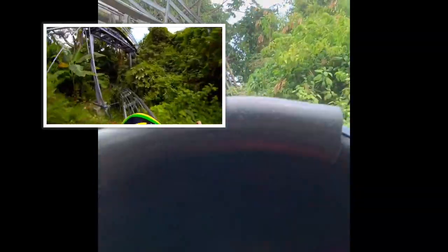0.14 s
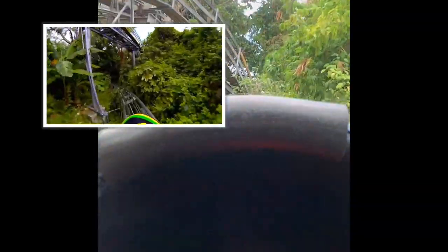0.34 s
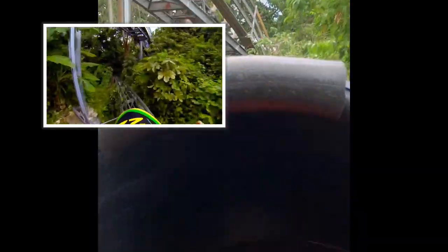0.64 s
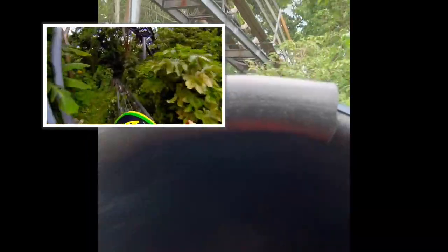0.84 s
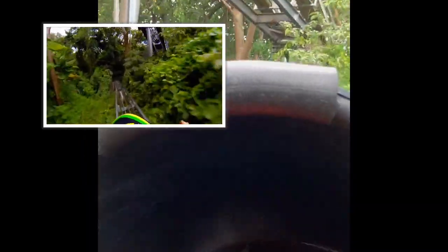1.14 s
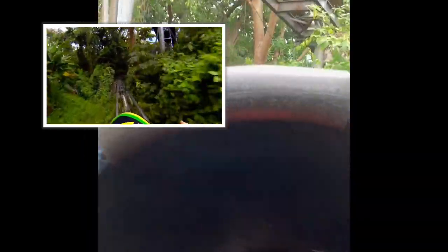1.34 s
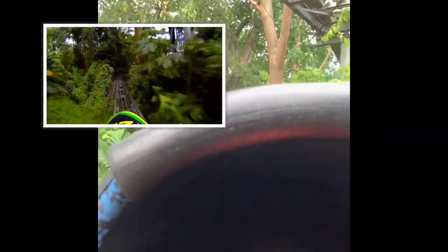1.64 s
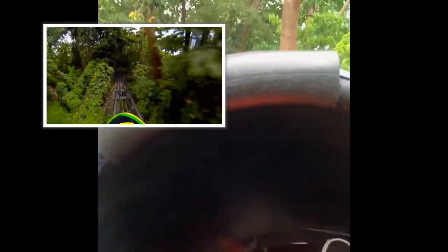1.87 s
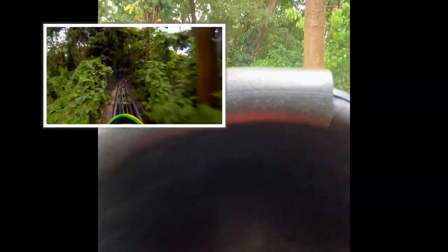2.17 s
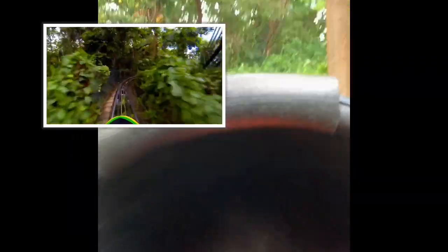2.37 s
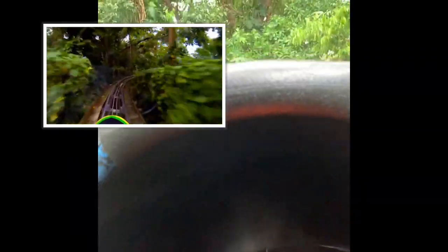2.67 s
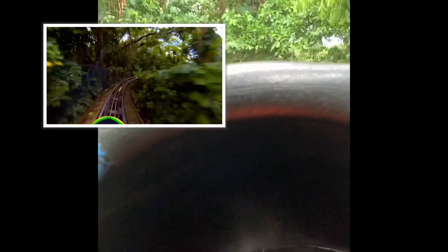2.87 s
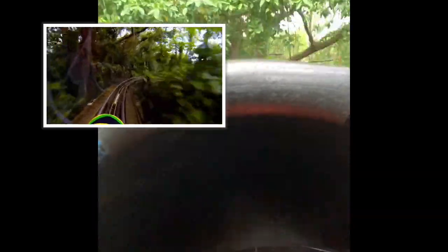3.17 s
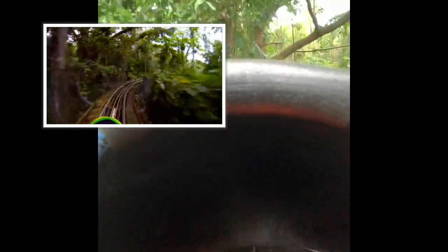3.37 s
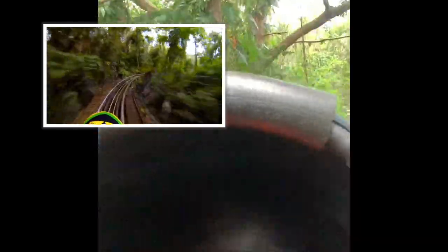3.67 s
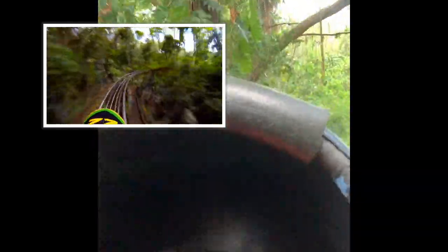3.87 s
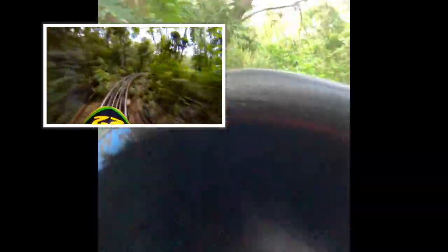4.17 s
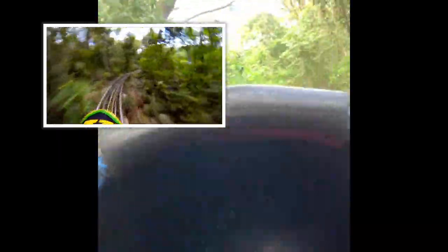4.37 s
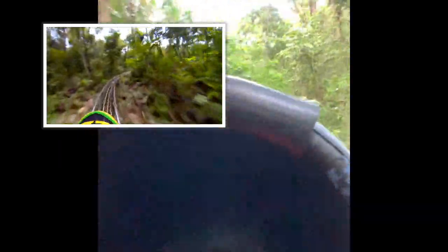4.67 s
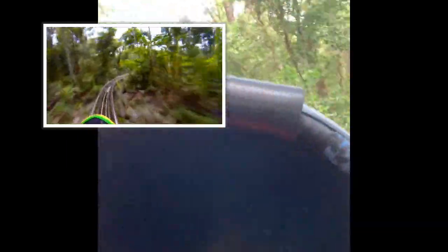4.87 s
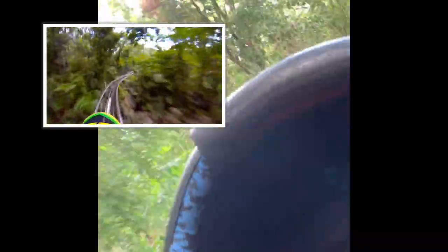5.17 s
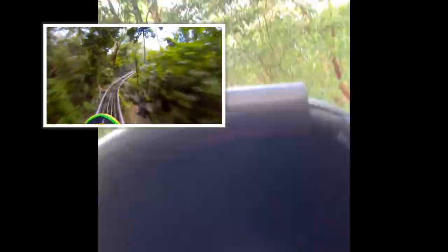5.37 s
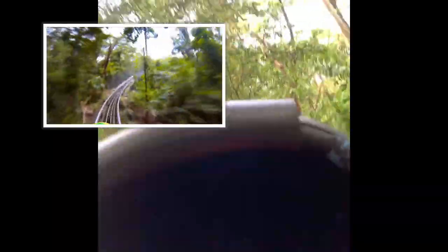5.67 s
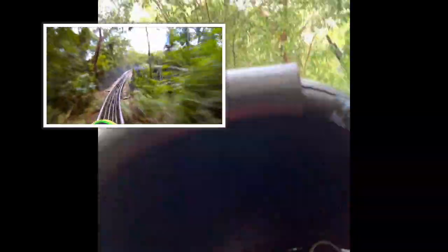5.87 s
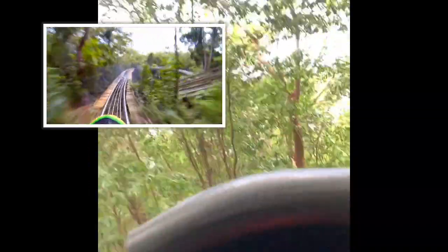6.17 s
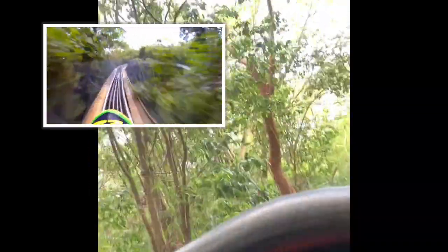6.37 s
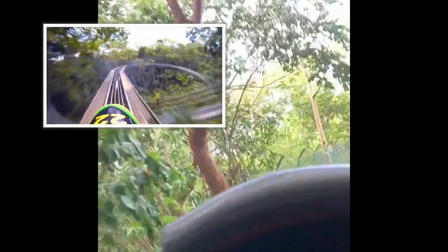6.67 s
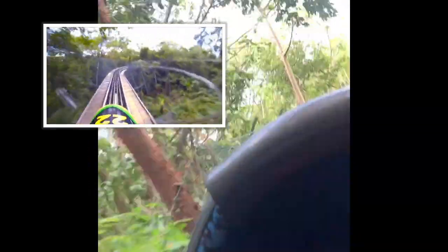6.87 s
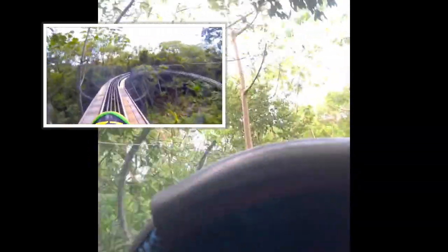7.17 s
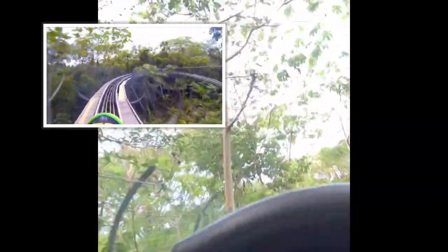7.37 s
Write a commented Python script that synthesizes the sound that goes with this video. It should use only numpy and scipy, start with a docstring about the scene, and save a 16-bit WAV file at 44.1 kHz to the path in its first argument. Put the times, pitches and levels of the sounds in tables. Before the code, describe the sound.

Heard from the seat, wheels rumble and drone ever faster on steel rails, with buffeting air, clatter, and a burst of bangs past midway.

```python
"""On a mountain coaster, heard from the seat: a car gathers speed down a track of steel tubes.
Slightly uneven wheels throb with each turn and shake the shell, the wheels and the tubes into a drone and roar.
Random taps make the wheel carriers clatter, rubbing parts sing gliding tones, and air buffets and hisses.
A bright fizz, faint at first, grows stronger and swells along with the hiss.
Bumps boom, ticks snap, loose fittings crack and ring, and slamming carriers clank: short hits at set times."""
import sys
import numpy as np
from scipy import signal
from scipy.fft import rfft, irfft, next_fast_len
from scipy.io import wavfile

SR = 44100
rng = np.random.default_rng(int(sys.argv[2]) if len(sys.argv) > 2 else 0)


def put_to_file(sound):
    """Save the sound as 16-bit audio at rate SR, in the file named by the first command-line argument."""
    columns = np.atleast_2d(sound).T  # one column per channel
    safe = np.clip(columns, -1, 1)
    whole_steps = np.round(safe * 32767)
    wavfile.write(sys.argv[1], SR, whole_steps.astype(np.int16))


N = 331632


def amp(db):
    """Turn decibels into a gain."""
    return 10 ** (np.asarray(db) / 20)


def unit(x):
    """Scale to rms 1."""
    return x / np.sqrt(np.mean(x ** 2) + 1e-20)


def along(points, hz):
    """Read a (frequency, value) table on a log frequency axis."""
    f, v = np.transpose(points)
    return np.interp(np.log(hz + 1), np.log(f + 1), v)


def wobble(rate):
    """A smooth random curve with rate new random values a second."""
    count = int(N * rate / SR) + 4
    fine = signal.resample_poly(rng.standard_normal(count), 8, 1)
    return np.interp(np.arange(N) * rate / SR, np.linspace(0, count, len(fine)), fine)


def stretches(rows, attack_s, release_s):
    """Rise, hold and fall for each (start, length, dB, ..) row: one summed curve for each dB column."""
    t = np.arange(N) / SR
    shapes = []
    for start, length, *_ in rows:
        rise = (t - start) / attack_s
        fall = 1 - (t - start - length) / release_s
        shapes.append(np.clip(np.minimum(rise, fall), 0, 1))
    return np.array(rows)[:, 2:].T @ np.array(shapes)


def humps(rows):
    """A smooth swell or dip for each (middle, length, dB) row, summed."""
    t = np.arange(N) / SR
    return sum(db * np.cos(np.pi * np.clip((t - s) / length, -.5, .5)) ** 2 for s, length, db in rows)


def filtered(x, response):
    """Apply a complex response of frequency."""
    size = next_fast_len(N + SR // 2)
    return irfft(rfft(x, size) * response(np.fft.rfftfreq(size, 1 / SR)), size)[..., :N]


def resonant(modes, hz):
    """Response of several resonances, added with alternating sign."""
    total = 0
    for k, (centre, width, db) in enumerate(modes):
        damping = 1j * hz * width
        total = total + (-1) ** k * amp(db) * damping / (centre * centre - hz * hz + damping)
    return total


# how alike left and right are: f/Hz, likeness (1 = the same)
LIKENESS = [(30, .985), (125, .975), (250, .89), (350, .8), (490, .87), (720, .25), (870, .62), (1200, .8),
            (1600, .82), (2300, .56), (2900, .42), (3500, .78), (4400, .9), (4900, .995), (6200, .9),
            (7100, .99), (8000, .9), (9000, .998), (15000, .99)]


def spread(pair, response):
    """Colour two unrelated signals and blend them into left and right, at rms 1."""
    def blend(hz):
        turn = np.arccos(np.clip(along(LIKENESS, hz), -1, 1)) / 2
        return response(hz) * np.array([np.cos(turn), np.sin(turn)])
    mid, side = filtered(pair, blend)
    return unit(np.array([mid + side, mid - side]))


def rush(spectrum):
    """Air noise: random stereo noise in the given colour."""
    return spread(rng.standard_normal((2, N)), lambda hz: amp(along(spectrum, hz)))


# how fast the wheels spin: t/s, speed/turns per second
WHEEL_SPEED = [(0.0, 12.14), (0.5, 12.28), (1.0, 12.71), (1.5, 13.27), (2.0, 14.12), (2.5, 15.64),
               (3.0, 17.19), (3.5, 18.89), (4.0, 20.37), (4.5, 21.19), (5.0, 21.58), (5.5, 22.82),
               (6.0, 25.25), (6.5, 26.97), (7.0, 28.08), (7.52, 29.01)]


def wheel_speed():
    """Wheel turns per second at every sample."""
    s, turns = np.transpose(WHEEL_SPEED)
    return np.interp(np.arange(N) / SR, s, turns)


def doublings():
    """How many times the speed has doubled since the start."""
    speed = wheel_speed()
    return np.log2(speed / speed[0])


def load(lead):
    """Swing of the wheel load: once a turn with a weaker double beat, less at high speed."""
    speed = wheel_speed()
    angle = 2 * np.pi * np.cumsum(speed) / SR + lead
    return (np.cos(angle) + .25 * np.cos(2 * angle - 1.2)) * (speed[0] / speed) ** .6


def contact(throb_db, flutter_db, lead):
    """Force of the wheels on the rail: surface noise that swells with the load."""
    swell = amp(throb_db * load(lead) + flutter_db * wobble(45))
    return lambda: swell * rng.standard_normal((2, N))


def shaken(force, modes, spectrum, direct_db, blur_db, swell_db):
    """A shaken part: randomly swelling resonances, plus broad noise whose share changes with speed."""
    colour = lambda hz: amp(along(spectrum, hz))
    drive = spread(force(), colour)
    rings = 0
    for mode in modes:
        ringing = filtered(drive, lambda hz: resonant([mode], hz))
        rings = rings + amp(swell_db * wobble(5)) * ringing
    broad = amp(direct_db + blur_db * doublings())  # blur_db is per doubling of speed
    return (rings + broad * spread(force(), colour)) / np.hypot(broad, rings.std())


def blows(rows, shape):
    """Place a freshly made hit of peak 1 at each (time, dB, ..) row."""
    out = np.zeros(N + SR)
    for s, db, *rest in rows:
        hit = shape(*rest)
        out[round(s * SR):][:len(hit)] += amp(db) * hit / abs(hit).max()
    return out[:N]


def ring(modes, t):
    """Fading tones, at slightly new pitches and strengths for every blow."""
    total = 0
    for hz, width, db in modes:
        pitch = hz * rng.normal(1, .02)
        strength = amp(db + rng.normal(0, 1.5))
        total = total + strength * np.exp(-np.pi * width * t) * np.sin(2 * np.pi * pitch * t)
    return total


# resonances of the shell, wheels and steel tubes: f/Hz, width/Hz, relative level/dB
SHELL_MODES = [(105.5, 28, 0.5), (139.2, 40, 2.5), (178.6, 31, 0), (230.7, 34, -4.5)]
WHEEL_MODES = [(302, 42, -4), (392.6, 97, -1.5), (470.4, 40, 1.5), (562, 9.3, -2.5)]
TUBE_MODES = [(857, 43, 5), (1096, 34, 3), (1212, 34, -1), (1464, 210, -7), (1585, 100, -21.5),
              (2126, 8.5, 4.5), (2273, 32, -0.5)]
# colours of the noise that shakes each of them: f/Hz, relative level/dB per Hz
RUMBLE_COLOUR = [(30, -26.5), (80, -2.5), (130, 1.5), (240, -1), (330, -11.5), (700, -30.5), (2000, -93)]
DRONE_COLOUR = [(120, -60), (280, -0.5), (480, -0.5), (580, -6), (700, -6.5), (1200, -25.5), (3000, -70)]
ROAR_COLOUR = [(300, -26), (650, -8.5), (900, 4), (1150, 3.5), (1600, -2), (2000, -4), (2400, -10),
               (2750, -10.5), (4500, -57), (8000, -61.5)]
# rough stretches of track: start t/s, length/s, added wheel drone level/dB, added rail roar level/dB
ROUGH_TRACK = [(.5, 0.58, 0, 1.5), (1.42, 0.88, 1, 2.5), (2.28, 0.26, 1.5, 2), (2.55, 0.71, 1.8, 0.5),
               (3.6, 0.63, 0.2, 2.1), (4.11, 0.43, 0.5, 2), (4.39, 0.33, -0.5, 4.5), (4.688, 0.18, 8, 8),
               (4.79, 0.085, -1.5, 2.5), (4.9, 0.24, 4.5, 6.5), (5.13, 0.37, 2.5, 7),
               (5.58, 0.063, -1, 6.5), (6.25, 0.16, -0.5, 2), (6.95, 0.1, 1, 1), (7.43, .2, 6.5, 5)]
ROUGH_ATTACK_S, ROUGH_RELEASE_S = 0.016, 0.055
# the track presses the car down in a bend or lets it go light: middle t/s, length/s, added rumble level/dB
BEND_LOAD = [(.88, .35, -2), (2.57, 0.16, -4), (4.5, 4.7, 2.5), (4.95, 0.2, -5), (5.69, .12, -2),
             (6.325, 0.13, -2), (6.65, .6, -1), (7.28, 0.23, -2)]
# RISE is added level for each doubling of speed; SHARE is how much of the rough wheel dB the shell gets
RUMBLE_DB, RUMBLE_SHARE = -20.5, 0.32
DRONE_DB, DRONE_RISE_DB = -27.5, 3
ROAR_DB, ROAR_RISE_DB = -35.5, 2.5
RAIL_LEAD = .45  # radians of a turn added to the rail's throb


def rolling():
    """The rolling force makes the shell rumble, the wheels drone and the steel tubes roar."""
    rough_wheel_db, rough_rail_db = stretches(ROUGH_TRACK, ROUGH_ATTACK_S, ROUGH_RELEASE_S)
    rumble_db = RUMBLE_DB + humps(BEND_LOAD) + RUMBLE_SHARE * rough_wheel_db
    drone_db = DRONE_DB + DRONE_RISE_DB * doublings() + rough_wheel_db
    roar_db = ROAR_DB + ROAR_RISE_DB * doublings() + rough_rail_db + 0.5 * wobble(12.0)

    cushioned = contact(throb_db=2, flutter_db=.7, lead=.2)
    hard = contact(throb_db=2.3, flutter_db=1, lead=0)
    steel = contact(throb_db=2.7, flutter_db=1.3, lead=RAIL_LEAD)

    shell = shaken(cushioned, SHELL_MODES, RUMBLE_COLOUR, direct_db=-11.5, blur_db=10.5, swell_db=1.8)
    wheels = shaken(hard, WHEEL_MODES, DRONE_COLOUR, direct_db=-4.5, blur_db=-2.5, swell_db=1)
    rail = shaken(steel, TUBE_MODES, ROAR_COLOUR, direct_db=-9.0, blur_db=8.0, swell_db=2)
    return amp(rumble_db) * shell + amp(drone_db) * wheels + amp(roar_db) * rail


# resonances of the chattering wheel carriers: f/Hz, width/Hz, relative level/dB
CARRIER_MODES = [(910, 200, 0.5), (1123, 147, 3.5), (1380, 200, 3), (1637, 150, -2.5), (1894, 220, -4),
                 (2132, 170, -3), (2373, 320, -2.5)]
# short bursts of rattling: start t/s, length/s, added clatter level/dB
RATTLE_BURSTS = [(2.13, 0.012, 4.5), (2.222, 0.032, 10.5), (2.275, 0.027, 6.5), (2.372, 0.029, 10),
                 (2.425, 0.032, 11), (2.59, 0.015, 8.5), (2.96, 0.022, 3), (3.29, 0.033, 11),
                 (4.14, 0.042, 1.5), (4.7, .065, 4.5), (4.8, 0.13, 4.5), (4.925, .1, 5.5), (5.003, 0.02, 6),
                 (5.15, .025, 3.5), (5.645, 0.033, 3), (6.362, .03, 5), (6.59, 0.022, 4), (7.46, .03, 1.5)]
RATTLE_ATTACK_S, RATTLE_RELEASE_S = .004, .015
CLATTER_DB, CLATTER_RISE_DB = -44.5, 5.5  # rise for each doubling of speed
CLATTER_GROWS = 1.014  # dB of clatter for each dB of added rail roar
CLATTER_THROB_DB, CLATTER_PATCHY_DB = 1.8, 2  # swing with the wheel load; random swing of each mode
TAPS_PER_S = 190  # at the starting speed, on smooth track
TAP_CROWDING = .55  # share of the shaking, in dB, that makes taps more frequent


def clatter():
    """Loose wheel carriers chatter: random taps ring their modes, in crowds with speed and on rough track."""
    _, rough_rail_db = stretches(ROUGH_TRACK, ROUGH_ATTACK_S, ROUGH_RELEASE_S)
    burst_db, = stretches(RATTLE_BURSTS, RATTLE_ATTACK_S, RATTLE_RELEASE_S)
    shake_db = CLATTER_RISE_DB * doublings() + CLATTER_GROWS * rough_rail_db + burst_db
    crowd = amp(TAP_CROWDING * shake_db)
    when = np.flatnonzero(rng.random(N) < crowd * TAPS_PER_S / SR)
    # crowded taps are smaller, so that crowding alone adds no power
    size = amp(rng.uniform(-5.6, 5.6, N))[when] / np.sqrt(crowd[when])

    def taps():
        # the same moments each time, with new strengths and signs
        return np.bincount(when, size * rng.uniform(-1, 1, N)[when], N)

    rings = 0
    for centre, width, db in CARRIER_MODES:
        pair = np.array([taps(), taps()])
        mode = spread(pair, lambda hz: resonant([(centre, width, 0)], hz) ** 2)
        rings = rings + amp(db + CLATTER_PATCHY_DB * wobble(25)) * mode
    return amp(CLATTER_DB + shake_db + CLATTER_THROB_DB * load(RAIL_LEAD)) * unit(rings)


# colour of the air's thuds: f/Hz, relative level/dB per Hz
BUFFET_COLOUR = [(8, -4), (20, -2), (42, 3), (70, 2.5), (110, -11), (250, -18.5), (800, -96.5)]
# gusts and lulls at the microphones: middle t/s, length/s, added level/dB
AIR_GUSTS = [(0.078, 0.21, 3.5), (1.35, .6, 7.5), (2.453, 0.27, 10.5), (3.27, 0.28, 4), (3.628, 0.35, 6),
             (4.33, 0.64, 3.5), (5.2, 0.74, 5.5), (5.75, 0.79, 6.5), (6.24, 0.33, 5.5), (6.33, 0.11, -5),
             (6.696, 0.69, 0)]
BUFFET_DB, BUFFET_RISE_DB = -30.5, 8  # rise for each doubling of speed


def buffeting():
    """Air thuds against the microphones, harder with speed and in smooth gusts."""
    level_db = BUFFET_DB + BUFFET_RISE_DB * doublings() + humps(AIR_GUSTS) + 1.3 * wobble(12)
    return amp(level_db) * rush(BUFFET_COLOUR)


# colours of the hiss and of the bright fizz: f/Hz, relative level/dB per Hz
HISS_COLOUR = [(1000, 15.5), (2600, 11), (4000, 12.5), (5400, 7.5), (6300, 4.5), (7300, -2), (8500, -6.5),
               (11000, -60), (16000, -41)]
FIZZ_COLOUR = [(1500, 2), (4000, -5), (7000, 7.5), (10000, 2.5), (12500, 3.5), (14000, 1.5), (16000, -8.5)]
# rushes of air past the car, short ones riding on long ones: start t/s, length/s, added level/dB
AIR_RUSHES = [(.49, 0.11, 6), (1.38, 1.14, 3), (2.88, .55, 1.4), (3.47, .42, 4.5), (4.1, 1.376, 6),
              (4.78, 0.45, 3), (5.56, 0.048, 6), (6.03, 0.39, 3.5), (6.79, 0.31, 3), (7.41, .2, 6.5)]
RUSH_ATTACK_S, RUSH_RELEASE_S = .06, .08
# puffs and lulls that flutter on the rushes: middle t/s, length/s, added level/dB
AIR_PUFFS = [(.15, 0.1, 5.5), (.765, 0.063, 3), (.94, 0.14, 1), (1.66, 0.12, 2.5), (1.74, .09, -4.5),
             (2.19, 0.079, 0), (2.45, 0.13, 2.5), (2.588, 0.039, 7.5), (3.305, .07, 3.5), (3.72, .2, 2),
             (4.165, .11, 4), (4.24, .09, 3.5), (4.38, .16, -3), (4.59, .16, 2.5), (4.71, 0.051, 8.5),
             (4.765, 0.055, -4), (4.825, .08, 8.5), (4.89, .07, 5), (5.02, 0.12, 6.5), (5.09, 0.06, 6),
             (5.16, .08, 6), (5.46, 0.074, 4.5), (5.79, .1, 3), (5.89, 0.082, -5.5), (6.22, 0.17, 3),
             (6.5, 0.077, -6), (6.61, .1, -0.5), (6.95, 0.066, 4), (7.09, 0.15, 3.5), (7.19, 0.096, -5.5),
             (7.29, 0.16, 1)]
HISS_DB, HISS_RISE_DB = -42.5, 1  # rise for each doubling of speed
FIZZ_DB, FIZZ_RISE_DB = -72.5, 15
FIZZ_GROWS, FIZZ_MOST_DB = 1.71, 21.5  # dB of fizz for each dB of a light swell in the hiss; the most it adds


def airstream():
    """Air hisses past in fluttering rushes; a bright fizz, faint at first, grows and swells with the hiss."""
    rush_db = stretches(AIR_RUSHES, RUSH_ATTACK_S, RUSH_RELEASE_S)[0] + humps(AIR_PUFFS)
    flutter_db = .7 * wobble(35) + .3 * wobble(11)
    fizz_swell_db = FIZZ_MOST_DB * np.tanh(FIZZ_GROWS * rush_db / FIZZ_MOST_DB)
    hiss_db = HISS_DB + HISS_RISE_DB * doublings() + rush_db + flutter_db
    fizz_db = FIZZ_DB + FIZZ_RISE_DB * doublings() + fizz_swell_db + 2 * flutter_db + 0.72 * wobble(210)
    return amp(hiss_db) * rush(HISS_COLOUR) + amp(fizz_db) * rush(FIZZ_COLOUR)


# wheels, rails and shell sing up briefly; levels are before the fades and the throb:
# start t/s, length/s, start f/Hz, middle f/Hz, end f/Hz, level/dB
SINGING_TONES = [(0.015, 1.9, 552, 559, 565, -35), (0.534, 0.069, 723, 755, 805, -32),
                 (.54, 0.087, 1870, 1950, 1970, -45), (0.546, 0.072, 1560, 1590, 1670, -43),
                 (0.738, 0.076, 1850, 1930, 1900, -44), (0.981, 0.15, 1820, 1800, 1650, -42),
                 (.9, 0.54, 844, 860, 852, -41.5), (1.593, 2, 534.5, 557, 581, -36),
                 (1.717, 0.52, 1120, 1090, 1177, -37.5), (1.8, 1.63, 132, 132.8, 135.6, -24.5),
                 (1.75, 0.73, 233.4, 236.7, 247.5, -31.5), (4.683, 0.045, 428, 446, 414, -19),
                 (5.144, 0.17, 1107, 1067, 1015, -26), (5.8, 0.32, 84.6, 112.8, 83.5, -16.5),
                 (6.38, 0.74, 1051, 1077, 1097, -39), (6.626, .2, 2060, 2140, 2120, -52)]
SING_FUZZ = 1.1  # random wavering, relative to the steady tone
SING_FADE = .4  # share of a tone's length spent swelling and fading
SING_THROB_DB = 3  # swing up and down with each turn of the wheels


def singing():
    """Rubbing contact feeds one resonance for a while: a fuzzy gliding tone that pulses with the wheels."""
    out = np.zeros(N + SR)
    for s, length, start_hz, middle_hz, end_hz, db in SINGING_TONES:
        count = round(length * SR)
        arch = np.polyfit([-1, 0, 1], [start_hz, middle_hz, end_hz], 2)
        pitch = np.polyval(arch, np.linspace(-1, 1, count))
        angle = 2 * np.pi * np.cumsum(pitch) / SR
        fuzz_rate = 2.6 * np.sqrt(start_hz)  # higher tones waver faster
        fuzz = lambda: SING_FUZZ * wobble(fuzz_rate)[:count]
        tone = np.sin(angle) * (1 + fuzz()) + np.cos(angle) * fuzz()
        fade = signal.windows.tukey(count, SING_FADE)
        out[round(s * SR):][:count] += amp(db) * fade * unit(tone)
    turn = 2 * np.pi * np.cumsum(wheel_speed()) / SR
    return out[:N] * amp(SING_THROB_DB * np.cos(turn))


# bumps in the track: t/s, peak level/dB, pitch as a multiple of the shell's own
TRACK_BUMPS = [(.073, -5, 1), (.322, -4, .9), (.535, -10, .8), (1.104, -3.5, 1), (1.287, -6, 1.1),
               (2.451, -16.5, .8), (3.156, -9, 1), (3.974, -4, 1.1), (4.278, -10, 1), (4.695, -11, 1),
               (4.75, -1, .9), (5.048, -1, 1.2), (5.094, -2.5, 1.2), (5.358, -9, .7), (5.481, 0, .8),
               (5.614, -4, 1.9), (5.728, -14, .9), (6.273, -7, .8), (6.364, -3, 1.3), (7.465, -4, .9)]
BUMP_ATTACK_S, BUMP_DAMPING_HZ = .006, 14  # attack at pitch 1; damping added to the shell's own width


def bumps():
    """The chassis drops over a bump and the shell gives a short, damped boom."""
    t = np.arange(SR // 5) / SR
    damped = np.exp(-np.pi * BUMP_DAMPING_HZ * t)

    def boom(pitch):
        onset = 1 - np.exp(-pitch * t / BUMP_ATTACK_S)
        return damped * ring(SHELL_MODES, pitch * t) * onset
    return blows(TRACK_BUMPS, boom)


# small sharp ticks: t/s, peak level/dB, brightness/dB per octave, time to fall 60 dB/s
SHARP_TICKS = [(.8212, -32, -9.5, 0.0076), (1.4272, -25, -8, 0.0078), (2.44, -34, 1.5, .007),
               (3.186, -39.5, 3.5, .007), (4.283, -24, -4.5, 0.0077), (4.751, -18.5, -6, 0.0063),
               (5.029, -6.5, -2, 0.0098), (5.157, -20.5, -11.5, .012), (5.3382, -7.5, 10, .0022),
               (5.5594, -11.5, -9, 0.0042), (5.674, -28, 6, .004), (5.837, -28, 13, .005),
               (5.844, -30.5, 11, 0.0033), (5.9853, -12.5, -1.5, .007), (6.054, -25.5, 3, 0.0037)]
# colour of a tick before its brightness is added: f/Hz, relative level/dB per Hz
SNAP_COLOUR = [(300, -44), (1200, -26), (3000, 10.5), (6500, 13.5), (9000, 0.5), (16000, -5)]


def ticks():
    """Hard little contacts snap without ringing: quickly fading bursts of noise."""
    t = np.arange(SR // 20) / SR
    hz = np.fft.rfftfreq(len(t), 1 / SR) + 1

    def snap(tilt_db, t60):
        colour = amp(along(SNAP_COLOUR, hz) + tilt_db * np.log2(hz))
        noise = irfft(rfft(rng.standard_normal(len(t))) * colour, len(t))
        return noise * amp(-60 * t / t60)
    return blows(SHARP_TICKS, snap)


# knocks of loose fittings: t/s, peak level/dB, approximate pitch f/Hz, width of the ring/Hz
FITTING_KNOCKS = [(.8213, -7.5, 1150, 400), (1.4275, -12, 1210, 450), (2.362, -26, 1400, 420),
                  (2.482, -16, 1000, 380), (3.088, -15, 1000, 420), (3.139, -21, 1600, 420),
                  (3.186, -15.5, 1350, 380), (4.888, -13, 1550, 200), (5.028, -11, 1650, 420),
                  (5.055, -11, 1270, 220), (5.079, -8.5, 2050, 400), (5.094, -6.5, 1870, 400),
                  (5.268, -9.5, 1100, 120), (5.338, -1, 1280, 560), (5.477, -9, 1650, 450),
                  (5.4795, -8.5, 730, 280), (5.664, -17.5, 2190, 200), (5.728, -33, 1500, 420),
                  (5.985, -14, 1800, 480), (6.271, -12, 2700, 700), (6.274, -18, 980, 300),
                  (6.366, -17, 1300, 350), (6.467, -16, 900, 300), (6.984, -18, 1960, 70),
                  (7.048, -18, 1700, 200), (7.054, -16, 2000, 220), (7.057, -18, 1080, 90)]
# modes of a fitting: multiple of its pitch, multiple of its width, relative level/dB
FITTING_MODES = [(1, 1, 0), (1.16, 1.6, -5), (1.5, 2.4, -14)]
# colour of the rough crack that starts a knock: f/Hz, relative level/dB per Hz
CRACK_COLOUR = [(200, -27), (700, 1), (1100, 7), (2200, -6), (3000, -18.5), (6000, -24.5), (12000, -59.5)]
CRACK_DB, CRACK_T60_S = -10.5, 0.018  # level beside the ring; time to fall 60 dB


def knocks():
    """A loose fitting gives a dry crack and a brief ring; the narrower its width, the longer it rings."""
    t = np.arange(SR // 20) / SR
    colour = amp(along(CRACK_COLOUR, np.fft.rfftfreq(len(t), 1 / SR)))
    onset = 1 - np.exp(-t / .0006)

    def knock(pitch, width):
        noise = unit(irfft(rfft(rng.standard_normal(len(t))) * colour, len(t)))
        crack = noise * amp(CRACK_DB - 60 * t / CRACK_T60_S)
        modes = [(pitch * k, width * w, db) for k, w, db in FITTING_MODES]
        return onset * (crack + ring(modes, t))
    return blows(FITTING_KNOCKS, knock)


# wheel carriers slam against the rail: t/s, peak level/dB
CARRIER_SLAMS = [(2.29, -13), (4.697, -12), (4.706, -7), (4.749, -5.5), (4.797, -16), (4.826, -14),
                 (4.97, -9), (5.478, -12.5), (7.481, -25)]
# what a slam rings with: approximate f/Hz, width/Hz, relative level/dB
SLAM_MODES = [(393, 70, 9), (463, 29, -3.5), (820, 40, -8), (1060, 37, -15), (1520, 62, -11),
              (2127, 32, -10), (2303, 49, -5.5)]
SLAM_ATTACK_S = 0.0012


def slams():
    """A carrier hits the rail hard: wheel and steel tube clank together."""
    t = np.arange(SR // 10) / SR
    onset = 1 - np.exp(-t / SLAM_ATTACK_S)
    return blows(CARRIER_SLAMS, lambda: ring(SLAM_MODES, t) * onset)


def scene():
    """Everything rides along with the car, in open air."""
    steady = rolling() + clatter() + buffeting() + airstream()
    return steady + singing() + bumps() + ticks() + knocks() + slams()


# phase lag of the right channel behind the left (below 0 it leads): f/Hz, lag/radians
RIGHT_PHASE_LAG = [(20, 0), (1150, -.25), (1650, 0), (2100, 1), (2650, 2.6), (3150, 1.5), (4000, 2.1),
                   (4900, 3.14), (6200, 5.6), (7400, 6.5), (8400, 9), (9600, 9.8), (10400, 12.2),
                   (11600, 12.8), (12600, 15.3), (13700, 15.9), (14600, 18.5), (16000, 19)]
TOP_HZ = 15900


def record(dry):
    """Stereo widening shifts left and right apart in phase; peaks are rounded off and the top treble is cut."""
    sides = np.array([[1], [-1]])
    pair = filtered(dry, lambda hz: np.exp(.5j * along(RIGHT_PHASE_LAG, hz) * sides))
    held = pair / (1 + np.abs(pair) ** 12) ** (1 / 12)
    return filtered(held, lambda hz: hz < TOP_HZ)


dry = scene()
out = record(dry)
put_to_file(out)
```